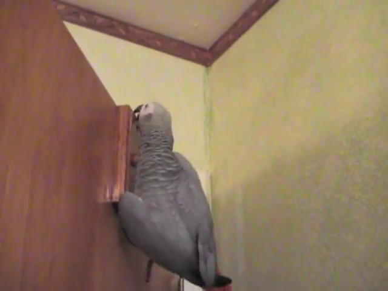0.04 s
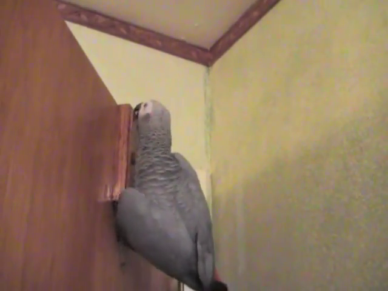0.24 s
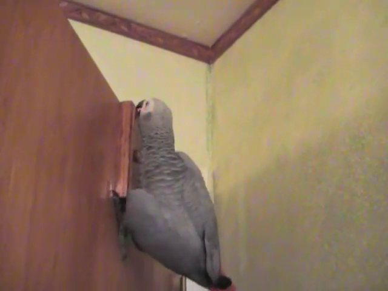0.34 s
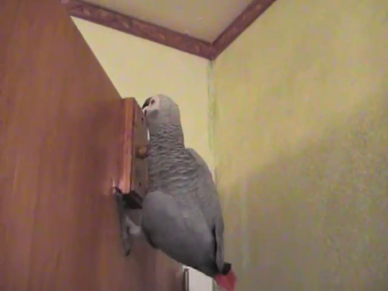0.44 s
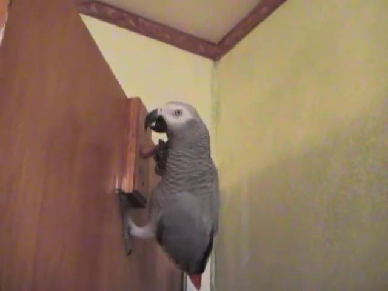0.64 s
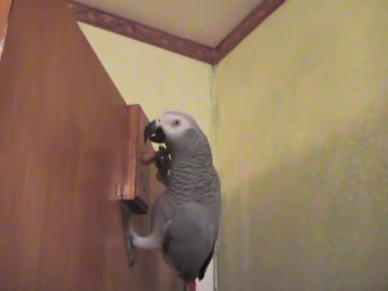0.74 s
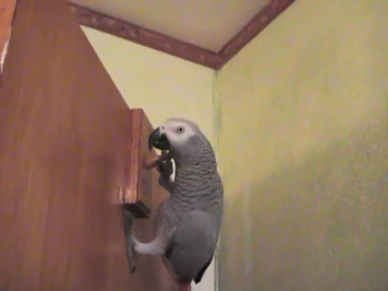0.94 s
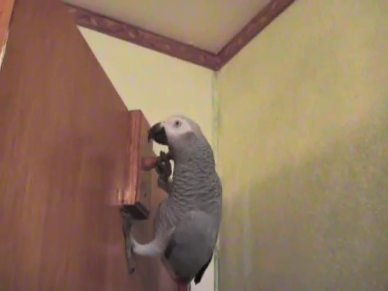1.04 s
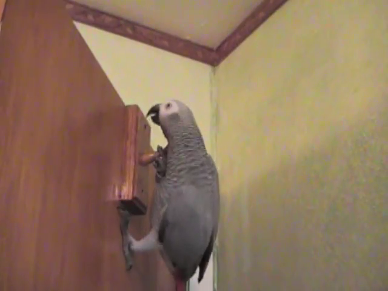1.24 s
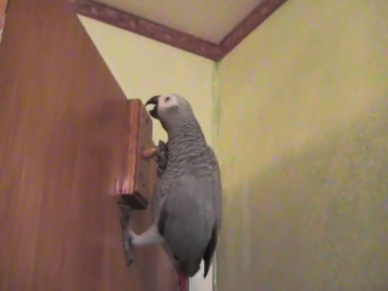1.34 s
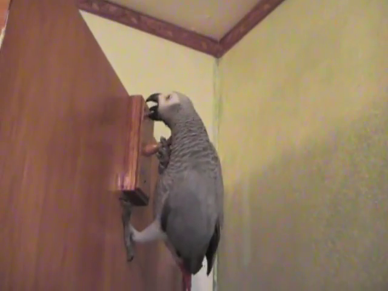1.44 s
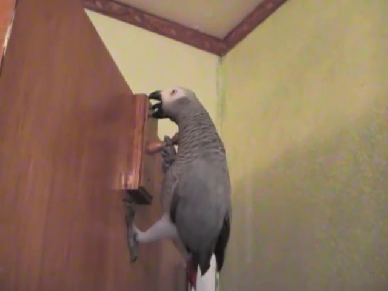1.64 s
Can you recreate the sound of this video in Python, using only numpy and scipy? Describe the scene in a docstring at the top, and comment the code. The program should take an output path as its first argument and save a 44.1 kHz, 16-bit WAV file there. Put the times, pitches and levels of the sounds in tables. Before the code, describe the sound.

Feathers scrape along wood as a bird climbs, its claws clicking and its steps knocking.

```python
"""A parrot clambers about on a wooden box fixed to a door, in the corner of a small, quiet room.
Its stiff feathers sweep once along the wood and rustle as it shifts. Its claws and beak click and tick,
and its heavier steps knock the box and set the door ringing. Close walls echo every touch."""
import sys
import numpy as np
from scipy import signal
from scipy.fft import rfft, irfft, next_fast_len
from scipy.io import wavfile
from scipy.ndimage import uniform_filter1d, minimum_filter1d

SR = 44100
rng = np.random.default_rng(int(sys.argv[2]) if len(sys.argv) > 2 else 0)


def generate_wav(sig):
    """Save sig (samples, or channels by samples) to the path in sys.argv[1] as 16-bit PCM at SR."""
    pcm = np.round(np.clip(np.atleast_2d(sig).T, -1, 1) * 32767).astype(np.int16)
    wavfile.write(sys.argv[1], SR, pcm)


N = 74970
T = np.arange(N) / SR
TAIL = SR // 2  # samples allowed for a sound to die away


def amp(db):
    """Turn decibels into a gain."""
    return 10 ** (np.asarray(db) / 20)


def unit(x):
    """Scale x to an average (rms) level of 1."""
    return x / np.sqrt(np.mean(x ** 2) + 1e-20)


def along(points, hz):
    """Read a curve of (pitch_hz, value) points at hz, on a log scale of pitch."""
    pitches, values = np.transpose(points)
    return np.interp(np.log(hz + 1), np.log(pitches + 1), values)


def filtered(x, response):
    """Turn each frequency of x up or down by the gain response(hz)."""
    n = x.shape[-1]
    size = next_fast_len(n + TAIL)
    return irfft(rfft(x, size) * response(np.fft.rfftfreq(size, 1 / SR)), size)[..., :n]


def coloured(x, spectrum):
    """Give x the tone of a spectrum, at an average level of 1."""
    return unit(filtered(x, lambda hz: amp(along(spectrum, hz))))


def pulse(spectrum, size=2048):
    """A click of peak 1 with the given spectrum, its energy packed at the start."""
    cepstrum = irfft(along(spectrum, np.fft.rfftfreq(size, 1 / SR)) * np.log(10) / 20)
    one_sided = np.r_[cepstrum[0], 2 * cepstrum[1:size // 2]]
    click = irfft(np.exp(rfft(one_sided, size)))
    return click / np.abs(click).max()


def add(out, start_s, sound):
    """Mix a sound into out at start_s."""
    i = max(round(start_s * SR), 0)
    out[:, i:i + sound.shape[-1]] += sound[..., :max(N - i, 0)]


def diffuse(n):
    """Noise from all sides: alike in both ears in the bass, wider in the treble."""
    # stereo width, side compared with middle: pitch_hz, level_db
    width = [(2500, -18), (5500, -8), (14000, -2.5)]
    mid, side = rng.standard_normal((2, n))
    side = filtered(side, lambda hz: amp(along(width, hz)))
    return np.array([mid + side, mid - side])


def in_room(x, echo_db):
    """The direct sound, quick echoes from the corner, then the fading echo of the room."""
    # time the room's echo takes to fall 60 dB: pitch_hz, fade_s
    room_fade = [(100, 0.77), (500, 0.63), (1500, 0.27), (4000, 0.27), (10000, 0.16), (16000, 0.06)]
    wall_delay_s, early_fade_s, early_db = 0.0015, 0.0094, 0.5
    hz, t, bands = signal.stft(diffuse(TAIL), SR, nperseg=256)
    fade = amp(-60 * t / along(room_fade, hz)[:, None])
    tail = signal.istft(bands * fade, SR, nperseg=256)[1][:, :TAIL]
    t = T[:TAIL]
    early = diffuse(TAIL) * amp(-20 * t / early_fade_s)
    echoes = np.array([tail, early]) * (t > wall_delay_s)
    tail, early = [echo / np.linalg.norm(echo[0]) for echo in echoes]
    response = amp(echo_db) * (tail + amp(early_db) * early) + (t == 0)
    return signal.fftconvolve(x[None], response, axes=1)[:, :N]


def moving_in_room(x, step_s=0.06):
    """As a source moves, each short piece of its sound gets different echoes."""
    out, hop = np.zeros((2, N)), round(step_s * SR)
    padded, window = np.pad(x, (0, 2 * hop)), signal.get_window("hann", 2 * hop)
    first_window = np.maximum(window, np.arange(2 * hop) < hop)
    for i in range(0, N, hop):
        piece = padded[i:i + 2 * hop] * (window if i else first_window)
        if piece.any():
            add(out, i / SR, in_room(piece, echo_db=1.5))
    return out


def room_tone():
    """The faint hush of the room's still air."""
    # tone of the hush: pitch_hz, level_db
    air = [(30, -34), (85, -33), (125, -2.5), (220, 5.5), (900, -1), (2500, -9.5), (10500, -12.5),
           (16000, -28)]
    return amp(-56.5) * coloured(diffuse(N), air)


def contacts(times, levels, spectrum, skid_s, echo_db, pitch=1):
    """Each hit skids for an instant and echoes in the room; pitch shifts its tone up or down."""
    out = np.zeros((2, N))
    for start_s, db, ratio in np.broadcast(times, levels, pitch):
        click = pulse(np.multiply(spectrum, [ratio, 1]))
        t = T[:len(click)]
        skid = rng.standard_normal(len(t)) * np.exp(-t / skid_s) + 3 * (t == 0)
        hit = signal.fftconvolve(click, skid / np.linalg.norm(skid))
        add(out, start_s, amp(db) * in_room(hit, echo_db))
    return out


def ring(hz, db, fade_s):
    """One ringing note of the wood, falling 60 dB in fade_s."""
    t = T[:TAIL]
    return amp(db - 60 * t / fade_s) * np.sin(2 * np.pi * (hz * t + rng.random()))


def knocks():
    """A step raps the box, thuds into the door and leaves both ringing."""
    # the heavier steps: start_s, rap_db, thud_db, door_ring_db
    steps = [(0.0951, -9, -29.5, -39.5), (0.1944, -26, -41, -56.5), (0.5324, -16, -47, -51.5),
             (1.369, -22, -36.5, -40.5), (1.383, -39, -27.5, -42.5), (1.428, -25.5, -29, -49),
             (1.444, -38.5, -30.5, -40.5), (1.503, -26.5, -37, -50), (1.52, -30, -34.5, -52),
             (1.6648, -32, -43, -51)]
    # tone of the rap on the box: pitch_hz, level_db
    rap_tone = [(150, -20), (600, -31.5), (1100, -6.5), (1800, -3.5), (3800, -11.5), (10000, -23.5),
                (15000, -46)]
    # tone of the thud in the door: pitch_hz, level_db
    thud_tone = [(40, -44.5), (120, -16.5), (270, 1), (420, -4.5), (700, -2.5), (1000, 3), (1400, -5.5),
                 (6000, -100)]
    # notes of the door: pitch_hz, level_db (added to door_ring_db), fade_s
    door_notes = [(76.5, -26.5, 2.3), (116, -13.5, 0.9), (187.4, -4, 0.38), (272.4, -4, 0.34),
                  (565.5, 3, 0.3), (836, 7, 0.22), (1044.5, 12.5, 0.13)]
    # notes of the box: pitch_hz, level_db (added to rap_db)
    box_notes = [(675, -26), (1530, -23.5), (2170, -23)]
    thud_lag_s = 0.00385  # the heavy door answers later than the box
    scatter_db = 3.5  # every step loads the door differently
    times, raps, thuds, _ = np.transpose(steps)
    out = contacts(times, raps, rap_tone, skid_s=1 / SR, echo_db=-0.5)
    out += contacts(times + thud_lag_s, thuds, thud_tone, skid_s=1 / SR, echo_db=2.0)
    swell = 1 - np.exp(-T[:TAIL] / 0.0087)  # the ringing builds up in about 9 ms
    for start_s, rap_db, _, door_db in steps:
        door = sum(ring(hz, door_db + db + scatter_db * rng.normal(), fade_s)
                   for hz, db, fade_s in door_notes)
        box = sum(ring(hz, rap_db + db, fade_s=0.16) for hz, db in box_notes)
        add(out, start_s, swell * (door + box))
    return out


def clicks_and_ticks():
    """Claws and beak click, each at its own pitch; slipping quills and claw tips tick."""
    # claw and beak clicks: start_s, level_db, pitch_ratio
    clicks = [(0.2106, -18.5, 1.34), (0.7888, -17.5, 0.93), (0.7993, -14, 1.08), (.8423, -10.5, 1.05),
              (0.8458, -11.5, 0.92), (0.9305, -26, 0.79), (1.0416, -22.5, 0.94), (1.0765, -14.5, 1)]
    # tone of a click: pitch_hz, level_db
    click_tone = [(200, -32.5), (1000, -6), (2000, -11.5), (3100, -3), (4300, -9.5), (6000, 4), (8200, -7),
                  (11500, -9.5), (16000, -27)]
    # thin, dry ticks: start_s, level_db
    ticks = [(.3007, 4), (0.3145, -4), (0.3473, 5), (0.3576, -7), (.634, -33), (.6625, -33), (.8316, -20.5),
             (0.8804, -23), (0.894, -27), (1.1253, -26), (1.2178, -33), (1.3365, -16.5)]
    # tone of a tick: pitch_hz, level_db
    tick_tone = [(500, -38), (6000, 3.5), (9000, 7), (11500, 8), (14000, -9), (16500, -5.5)]
    times, levels, pitch = np.transpose(clicks)
    clicking = contacts(times, levels, click_tone, skid_s=0.0003, echo_db=0, pitch=pitch)
    return clicking + contacts(*np.transpose(ticks), tick_tone, skid_s=0.00043, echo_db=-7.0)


def friction(slips_per_s=2000, spread_db=4.5, hiss_share=0.42):
    """Feathers catch on the grain of the wood: many tiny, uneven slips over a smooth hiss."""
    slips = (rng.random(N) < slips_per_s / SR) * rng.choice([-1, 1], N)
    sizes = amp(spread_db * rng.standard_normal(N))
    return np.sqrt(1 - hiss_share) * unit(slips * sizes) + np.sqrt(hiss_share) * rng.standard_normal(N)


def shuffles():
    """Feet and feathers rub as the bird shifts, swelling 20 dB in rise_s and fading 20 dB in fall_s."""
    # shifts of the body: peak_s, rise_s, fall_s, rustle_db, rub_db
    shifts = [(0.017, 0.038, 0.017, -52, -68), (0.037, 0.00076, 0.031, -40, -58.5),
              (0.059, 0.013, 0.031, -38.5, -55), (0.438, 0.039, 0.0087, -43.5, -45.5),
              (0.511, 0.068, 0.089, -61, -52), (0.634, 0.0046, 0.081, -54.5, -61),
              (0.783, 0.031, 0.053, -44.5, -46), (1.341, 0.024, 0.0095, -44, -45),
              (1.45, 0.023, 0.017, -45.5, -48.5), (1.667, 0.035, 0.014, -45, -44.5)]
    # tone of the bright rustle: pitch_hz, level_db
    rustle_tone = [(200, -26), (1000, -10), (2500, 5.5), (4000, 4.5), (6000, 1), (10500, 0), (13000, -11.5),
                   (16000, -46)]
    # tone of the low rub: pitch_hz, level_db
    rub_tone = [(100, -25), (300, 0), (650, 9.5), (1100, 6.5), (2200, 2.5), (6000, -42)]
    out = np.zeros((2, N))
    rustle, rub = coloured(friction(), rustle_tone), coloured(friction(), rub_tone)
    for peak_s, rise_s, fall_s, rustle_db, rub_db in shifts:
        start_s = peak_s - 2 * rise_s
        span = (T > start_s) & (T < peak_s + 2 * fall_s)
        shape = amp(-20 * np.maximum((peak_s - T[span]) / rise_s, (T[span] - peak_s) / fall_s))
        rubbing = amp(rustle_db) * rustle[span] + amp(rub_db) * rub[span]
        add(out, start_s, in_room(shape * rubbing, echo_db=2.5))
    return out


def quill_chatter(middle_s=0.23, half_length_s=0.0032, level_db=-12):
    """The quills judder during the sweep: a quick run of uneven slips, each ringing briefly."""
    slips_per_s, quill_hz, fade_s = 340, 2550, 0.0068
    out, t = np.zeros((1, N)), T[:TAIL]
    for k, (late, size_db, detune) in enumerate(rng.standard_normal((16, 3)), start=-8):
        offset_s = (k + 0.23 * late) / slips_per_s
        slip_db = level_db + size_db - 4.6 * (offset_s / half_length_s) ** 2
        shape = amp(slip_db - 60 * t / fade_s) * (1 - np.exp(-t * quill_hz))
        add(out, middle_s + offset_s, shape * np.sin(2 * np.pi * quill_hz * (1 + 0.099 * detune) * t))
    return in_room(out[0], echo_db=-2)


def feather_rasp():
    """A rough scrape whose pitch sinks as the feathers bend, then recovers."""
    # tone of the rasp before it is shifted: pitch_hz, level_db
    rasp_tone = [(100, -72), (650, -25), (1700, -10.5), (2450, -3.5), (3300, -11), (9000, -37),
                 (16000, -46)]
    # path of its strongest pitch: time_s, pitch_hz
    glide = [(.235, 3000), (.262, 2550), (.285, 1790), (.325, 2470)]
    hz, t, bands = signal.stft(friction(), SR, nperseg=256)
    peak_hz = max(rasp_tone, key=lambda point: point[1])[0]
    shift = np.interp(t, *np.transpose(glide)) / peak_hz
    gain = amp(along(rasp_tone, hz[:, None] / shift))
    return unit(signal.istft(bands * gain, SR, nperseg=256)[1][:N])


def feather_sweep():
    """Feathers drag along the wood: a rasp first, turning to a brighter hiss."""
    # loudness through the sweep: time_s, rasp_db, hiss_db
    loudness = [(.211, -31.5, -44), (0.221, -36.5, -34), (0.244, -30, -26), (0.268, -21.5, -29),
                (0.279, -28.5, -29), (.298, -32, -28), (0.317, -29, -22), (0.348, -37.5, -29.5),
                (0.364, -61, -54), (.435, -53, -51), (.47, -70, -63)]
    # tone of the hiss: pitch_hz, level_db
    hiss_tone = [(450, -37), (1500, -22), (3200, 1), (6500, -1), (10500, -2), (12500, -5.5), (16000, -29)]
    times, *levels = np.transpose(loudness)
    touching = (T > times[0]) & (T < times[-1])
    rasp_gain, hiss_gain = [amp(np.interp(T, times, db)) * touching for db in levels]
    return moving_in_room(rasp_gain * feather_rasp() + hiss_gain * coloured(friction(), hiss_tone))


def scene():
    """The parrot's movements over the hush of the room."""
    feathers = feather_sweep() + quill_chatter() + shuffles()
    return feathers + clicks_and_ticks() + knocks() + room_tone()


def record(dry):
    """The left microphone is a little brighter; a fast limiter holds the peaks; the top treble is cut."""
    # treble added on the left and taken from the right: pitch_hz, level_db
    treble_lean = [(9500, 0), (13000, 1)]
    ceiling, top_hz = 0.98, 16000
    x = filtered(dry, lambda hz: amp(along(treble_lean, hz) * np.array([[1], [-1]])))
    needed_gain = ceiling / np.maximum(np.abs(x), ceiling)
    smooth_gain = uniform_filter1d(minimum_filter1d(needed_gain, size=45), size=45)
    return filtered(x * smooth_gain, lambda hz: hz < top_hz)


dry = scene()
out = record(dry)
generate_wav(out)
```